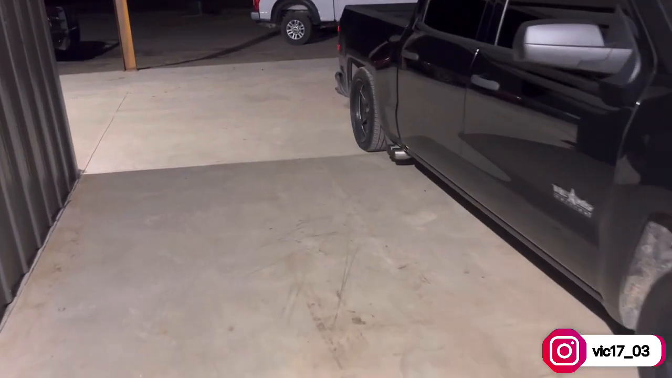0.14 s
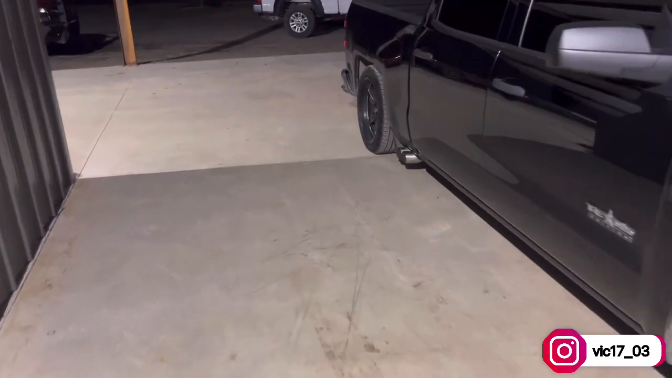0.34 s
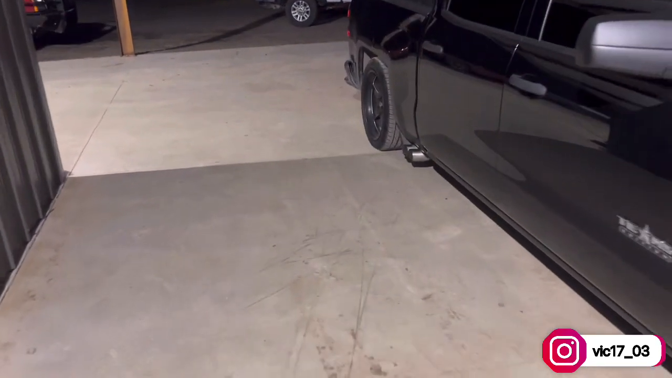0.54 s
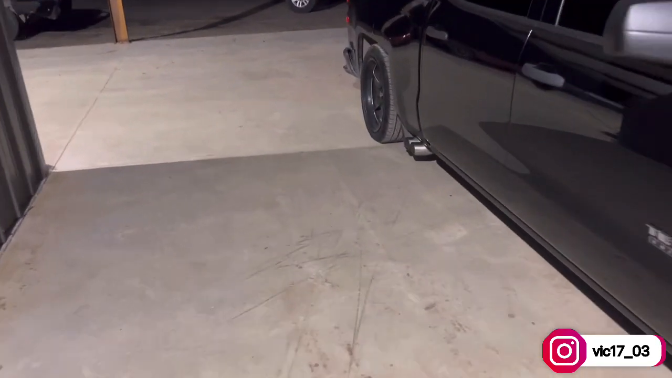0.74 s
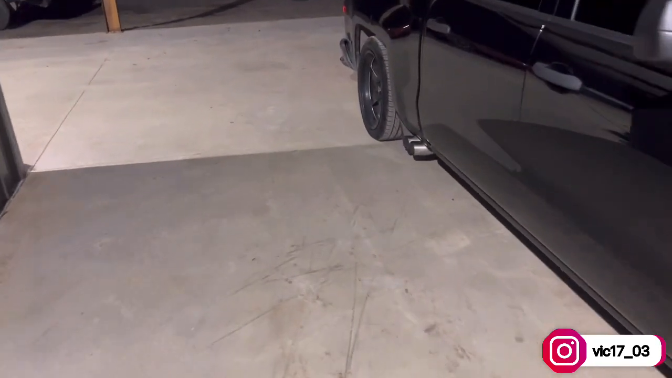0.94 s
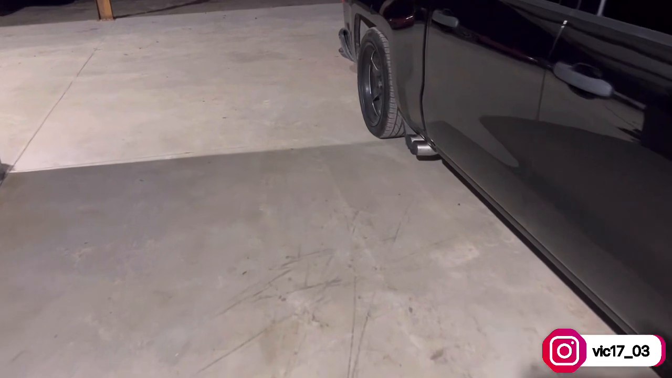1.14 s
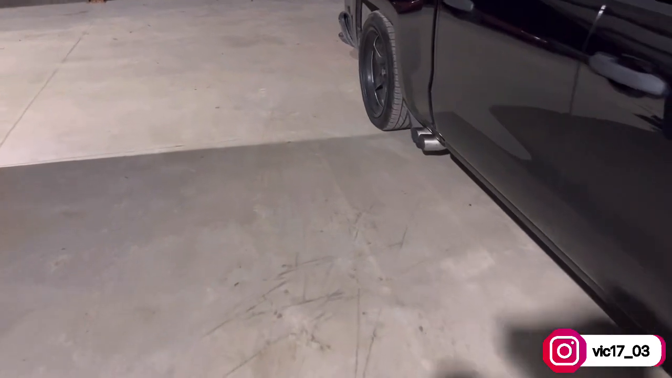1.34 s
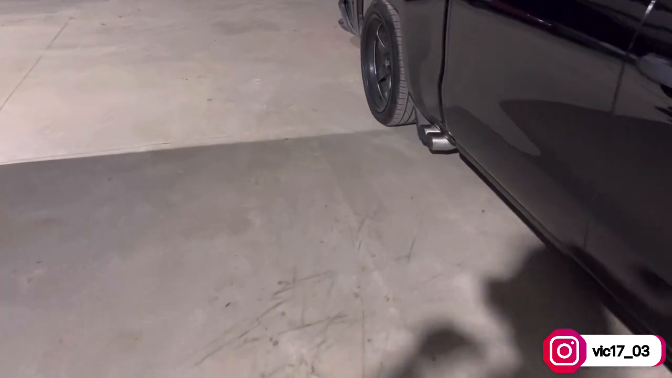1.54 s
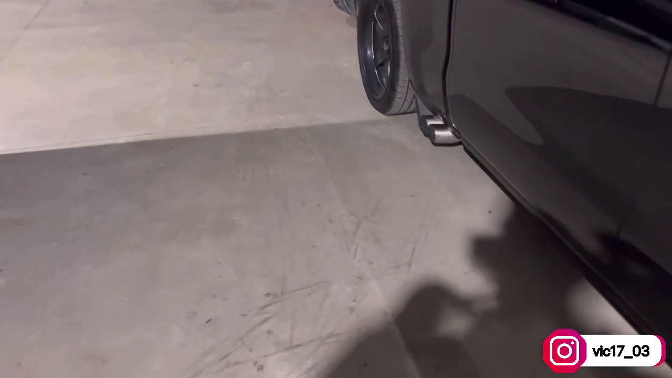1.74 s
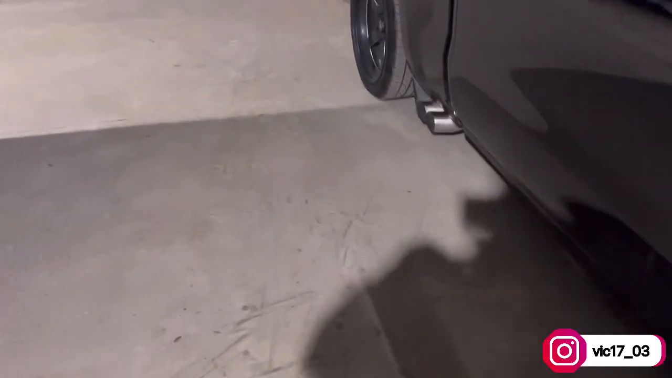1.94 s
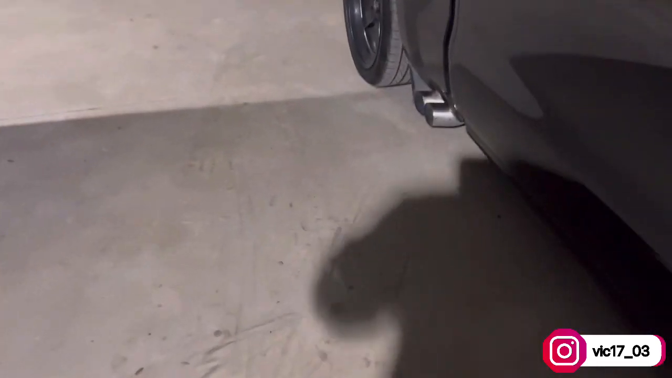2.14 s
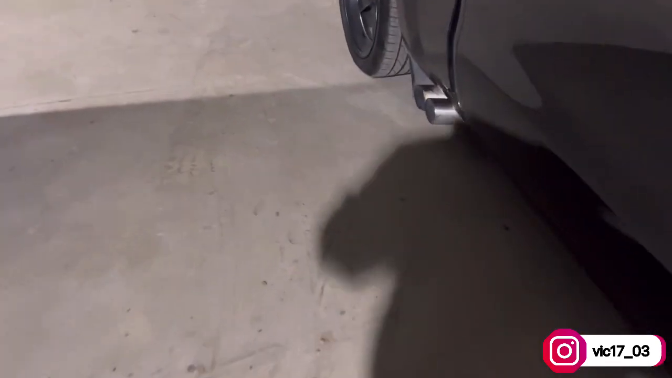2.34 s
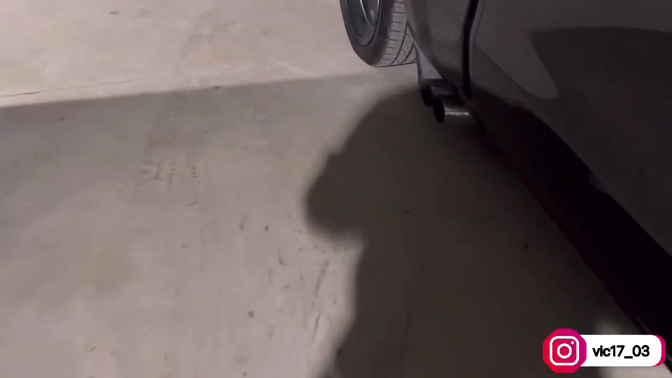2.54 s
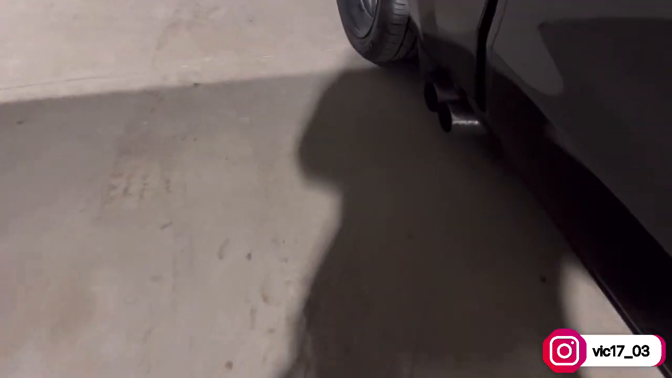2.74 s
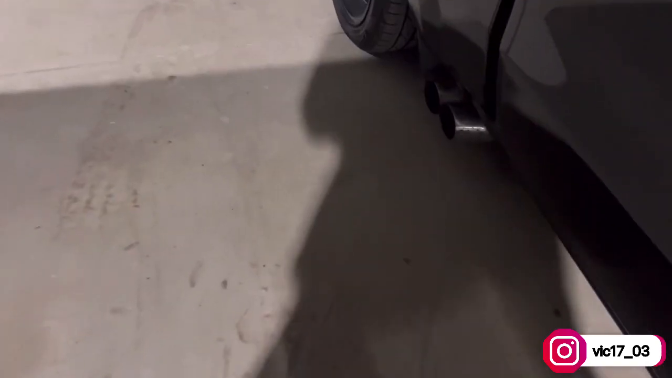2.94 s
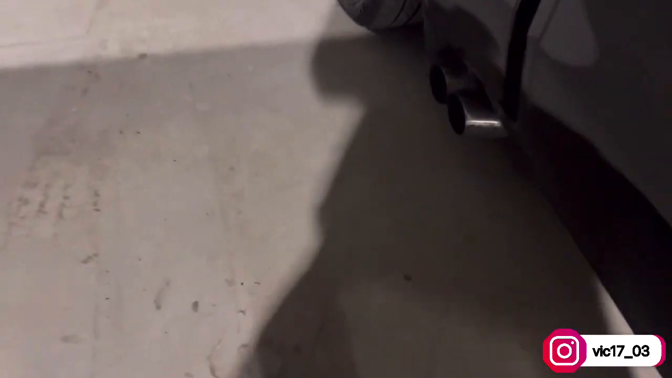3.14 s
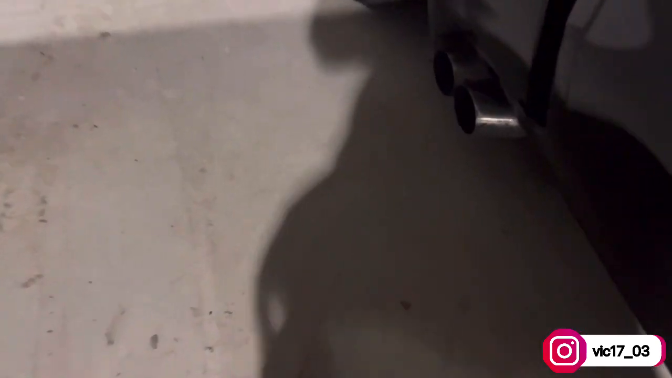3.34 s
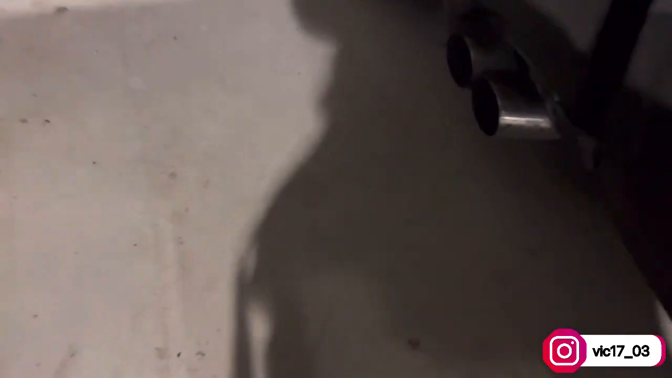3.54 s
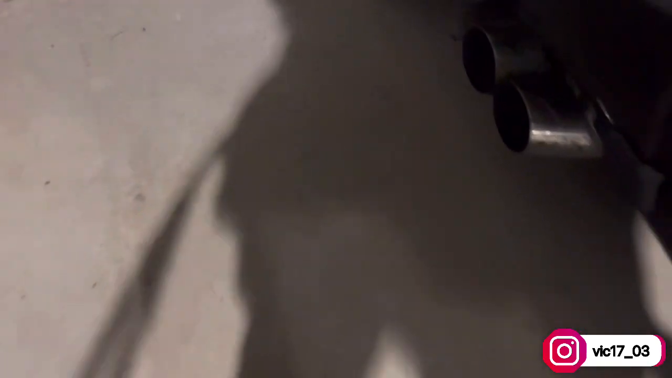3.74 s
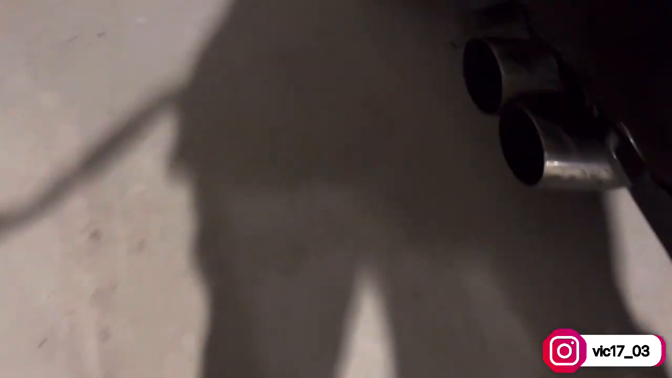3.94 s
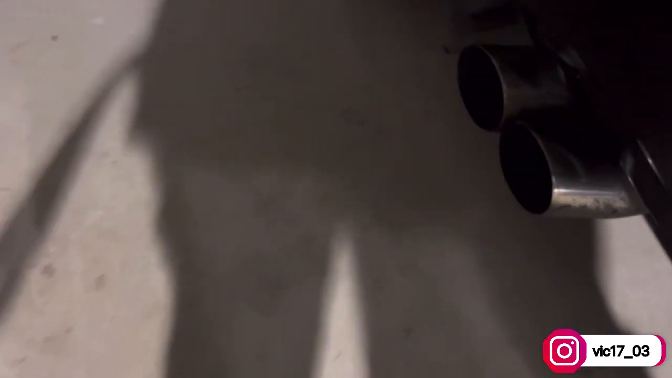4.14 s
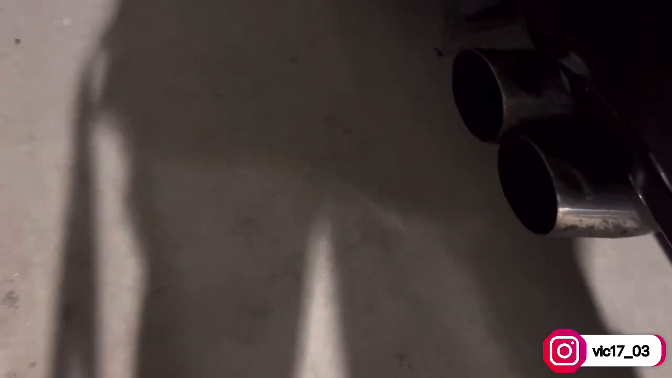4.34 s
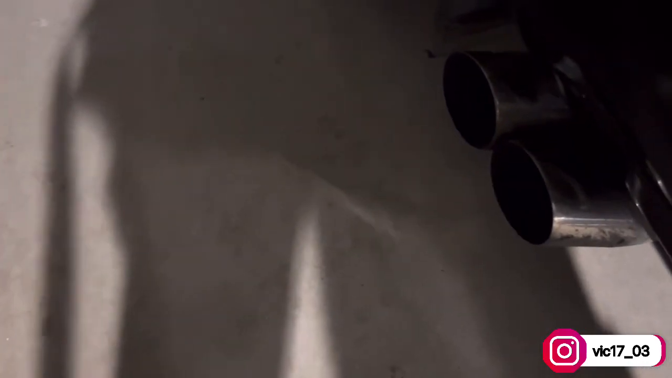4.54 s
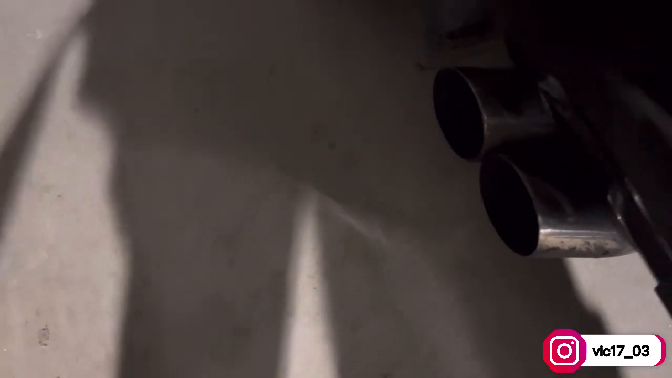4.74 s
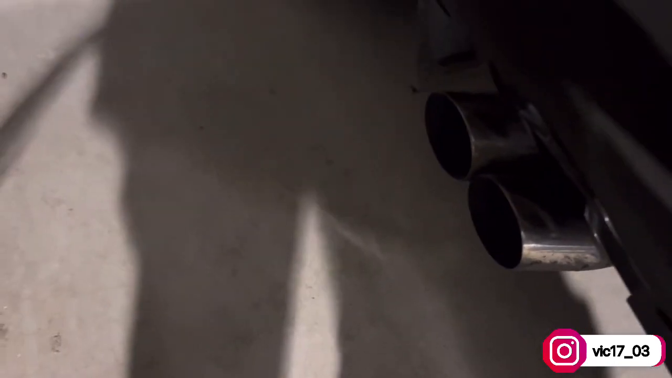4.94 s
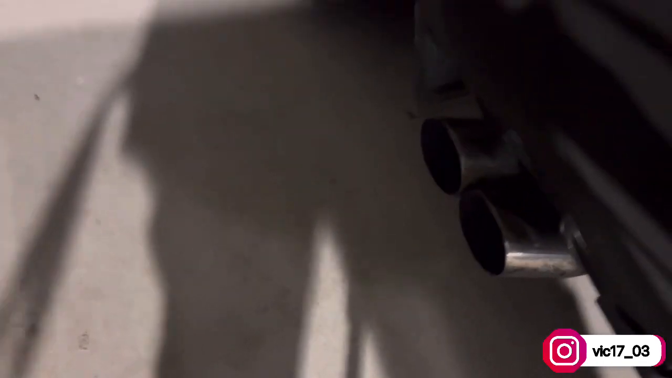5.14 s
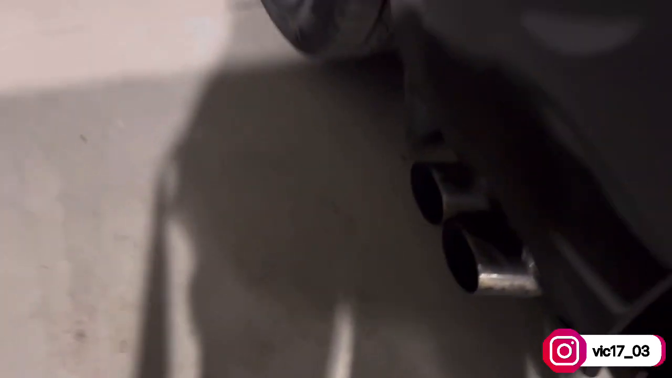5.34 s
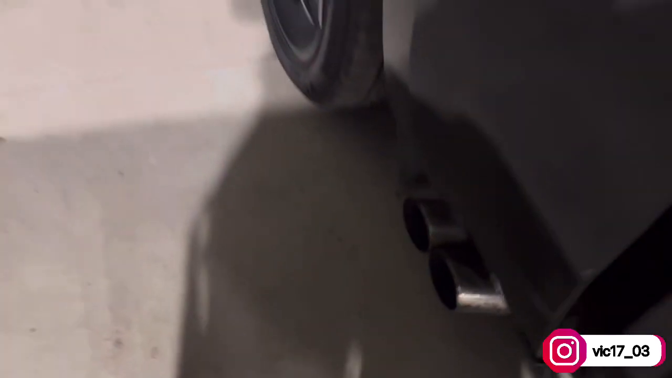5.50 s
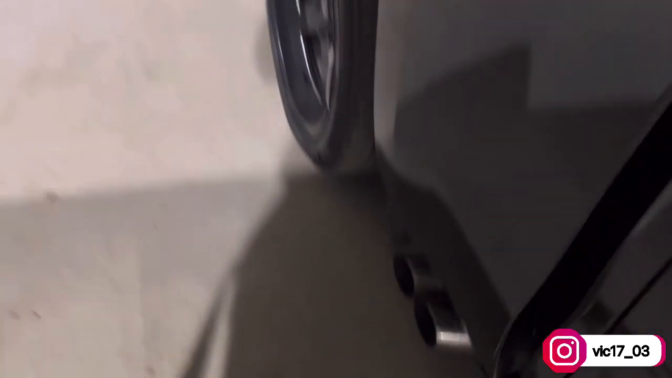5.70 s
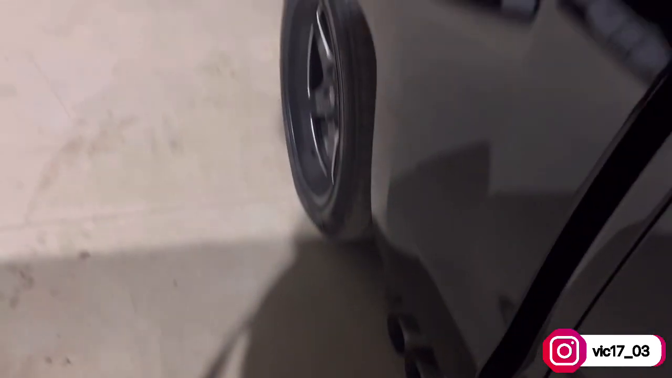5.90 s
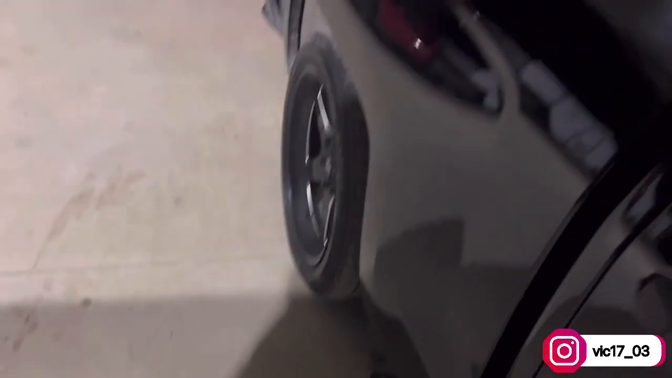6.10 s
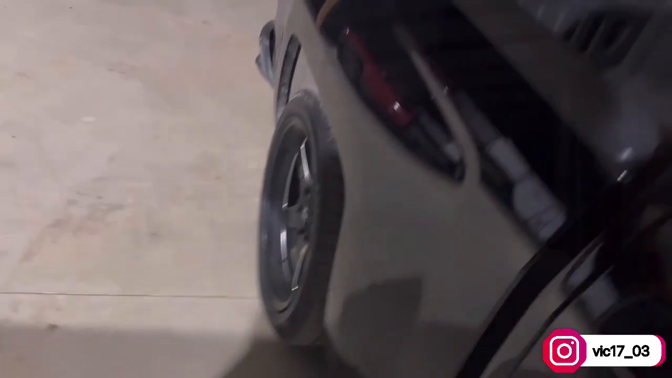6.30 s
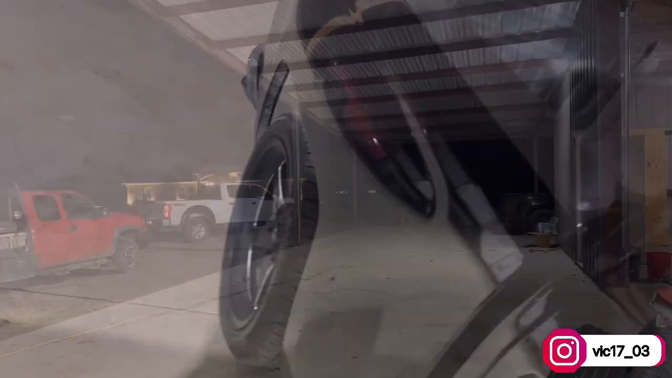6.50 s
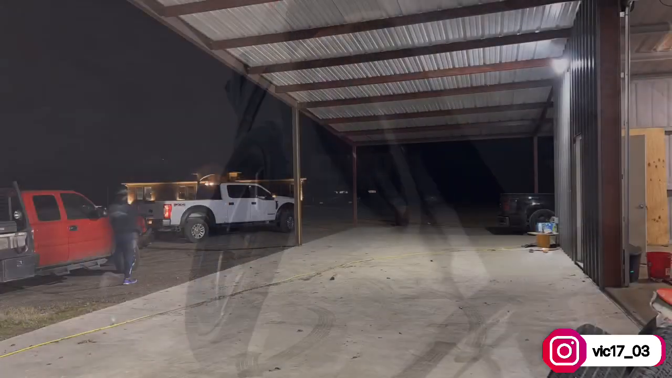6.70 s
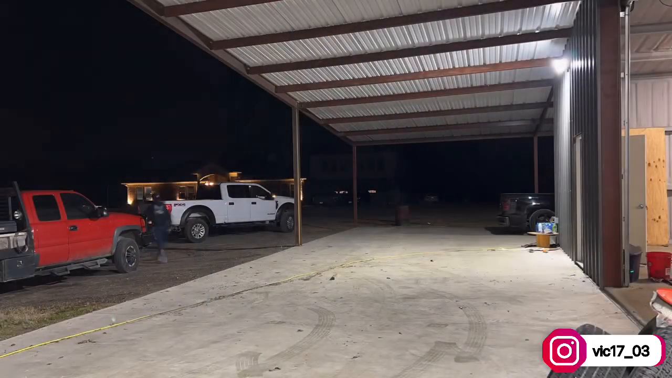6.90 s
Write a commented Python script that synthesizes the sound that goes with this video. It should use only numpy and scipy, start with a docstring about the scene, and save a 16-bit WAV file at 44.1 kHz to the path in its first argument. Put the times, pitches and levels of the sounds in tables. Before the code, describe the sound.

Continuous loping truck idle, already running at the start and never revving or stopping. At first it is a roomy, throbbing drone with blurred pulsing hiss from a few metres away. A handheld stereo pickup approaches the exhaust, the puffs become dry, raspy and crisp with spitting gas, strongest just past the middle, then the sound backs off and loses some roof echo. Soft footsteps barely show.

```python
"""Under a carport, a straight-piped V8 pickup idles as a microphone pair moves up to its side exhaust tips and past.
Eight uneven cylinders puff into the resonances of pipe and carport, which gives the lope; standing waves
crossed on the walk make the drone swell and fade. Each puff also rasps, as decaying echoes and pulsed
turbulence; close by, streaks in the rasp slide upward three times in each cycle. Gas spits at the tips as short
bursts of noise, blurred by the roof into a pulsing hiss from further off; soft noise swells are probably footsteps."""
import sys
import numpy as np
from scipy import signal
from scipy.fft import rfft, irfft, next_fast_len
from scipy.io import wavfile
from scipy.ndimage import uniform_filter1d, minimum_filter1d, map_coordinates

SR = 44100
rng = np.random.default_rng(int(sys.argv[2]) if len(sys.argv) > 2 else 0)


def int16_out(signal):
    """Quantize to a 16-bit WAV file."""
    q = np.round(np.clip(np.atleast_2d(signal).T, -1, 1) * 32767)
    wavfile.write(sys.argv[1], SR, q.astype(np.int16))


N = 311346
LEAD = SR  # samples: the engine is already running for a second before time zero
T = np.arange(-LEAD, N) / SR  # s
TOP_HZ = 15700  # upper band limit


def amp(db):
    """Logarithmic level: decibels to gain."""
    return 10 ** (np.asarray(db) / 20)


def unit(x):
    """Normalisation: x scaled to rms 1."""
    return x / np.sqrt(np.mean(x ** 2) + 1e-20)


def along(points, hz):
    """Logarithmic pitch: (frequency, value) points interpolated on a log frequency axis."""
    f, v = np.transpose(points)
    return np.interp(np.log(hz + 1), np.log(f), v)


def curves(rows):
    """Linear interpolation: one value per sample for each column after the time."""
    s, *columns = np.transpose(rows)
    return [np.interp(T, s, column) for column in columns]


def filtered(x, response):
    """Linear filtering: the spectrum of x times a response of frequency."""
    m = next_fast_len(len(T) + SR)
    return irfft(rfft(x, m) * response(np.fft.rfftfreq(m, 1 / SR)), m)[..., :len(T)]


def below(hz, edge_hz):
    """Low-pass filtering: gain that falls steeply above the edge."""
    return 1 / (1 + (hz / edge_hz) ** 20)


# Likeness of the two channels: (frequency [Hz], left-right correlation [0 to 1])
CHANNEL_CORRELATION = [(200, 0.86), (450, 0.87), (700, 0.41), (1200, 0.67), (2500, 0.75), (5000, 0.58),
                       (8000, 0.42), (11000, 0.13)]


def spread(mid, side, colour):
    """Interchannel coherence: the share of side against mid sets how alike left and right are."""
    def mid_and_side_gains(hz):
        turn = np.arccos(np.clip(along(CHANNEL_CORRELATION, hz), -1, 1)) / 2
        return amp(along(colour, hz)) * [np.cos(turn), np.sin(turn)]

    m, s = filtered(np.array([mid, side]), mid_and_side_gains)
    return unit(np.array([m + s, m - s]))


def impulses(times, sizes):
    """Impulsive excitation: one impulse of each size at each time."""
    at = np.clip(np.round(times * SR).astype(int) + LEAD, 0, len(T))
    return np.bincount(at, sizes, len(T) + 1)[:-1]


def smeared(x, kernel):
    """Superposition: x convolved with a causal kernel."""
    return signal.fftconvolve(x, kernel)[:len(T)]


def swell(rise):
    """Transient flow: the outline of one gush of gas peaks after rise seconds and dies away."""
    u = np.arange(SR // 4) / SR / rise
    return u * np.exp(1 - u)


def fading(t60):
    """Reverberant decay: an exponential of energy 1 that falls 60 dB in t60 seconds."""
    decay = amp(-60 * np.arange(SR // 2) / SR / t60)
    return decay / np.linalg.norm(decay)


def ring(puffs, modes, top_hz):
    """Modal resonance: puffs through each damped mode, one signal per mode, up to top_hz."""
    m = next_fast_len(len(T) + SR)
    f = np.fft.rfftfreq(m, 1 / SR)
    f = f[f < top_hz]
    spectrum = rfft(puffs, m)[:len(f)]
    rings = []
    for centre, width, db, *_ in modes:
        response = amp(db) * 1j * f * width / (centre * centre - f * f + 1j * f * width)
        rings.append(irfft(spectrum * response, m)[:len(T)])
    return rings


def wobble(rate):
    """Random fluctuation: a smooth curve through rate random knots a second."""
    knots = (T - T[0]) * rate
    return map_coordinates(rng.standard_normal(int(knots[-1]) + 4), [knots])


# Mean speed of the hunting idle: (time [s], crank speed [rpm])
IDLE_SPEED = [(0.0, 751.2), (0.41, 751.8), (0.83, 747.5), (1.24, 742.8), (1.66, 737.5), (2.07, 737.8),
              (2.49, 746.8), (2.9, 746.1), (3.32, 743.1), (3.73, 743.7), (4.15, 731.9), (4.56, 731.6),
              (4.98, 735.1), (5.39, 748.5), (5.81, 741.9), (6.22, 734.7), (6.64, 737.6), (7.05, 736.9)]


def engine_cycles():
    """Four-stroke timing: two crank turns make a cycle, and the crank never turns quite evenly."""
    waver_cycles, waver_per_s = .002, 7
    rpm, = curves(IDLE_SPEED)
    cycles = np.cumsum(rpm / 120) / SR
    return cycles - cycles[LEAD] + waver_cycles * wobble(waver_per_s)


def firings(cycles, pattern, scatter_db, jitter, cycle_db):
    """Cyclic variation: a row of impulses per cylinder, jittered (s) and scattered in strength (dB)."""
    late, db = np.transpose(pattern)
    whole = np.arange(np.ceil(cycles[0]) + 1, cycles[-1] + 1)[:, None]
    at = whole + (np.arange(len(late)) + late) / len(late)
    times = np.interp(at, cycles, T, right=T[-1] + 1) + jitter * rng.standard_normal(at.shape)
    burn_db = scatter_db * rng.standard_normal(at.shape)
    shared_db = cycle_db * rng.standard_normal(whole.shape)
    sizes = amp(db + burn_db + shared_db)
    return np.array([impulses(s, size) for s, size in zip(times.T, sizes.T)])


# Cylinders of each bank: (four places in the firing order [counted from 0])
BANK_CYLINDERS = [(0, 2, 5, 7), (1, 3, 4, 6)]


def by_bank(puffs):
    """Separate ducts: the puffs that go down each of the two pipes."""
    return [puffs[list(bank)].sum(axis=0) for bank in BANK_CYLINDERS]


# Path of the microphones: (time [s], distance to the exhaust tips [m])
TIP_DISTANCE = [(0, 3.03), (2, 2.04), (3, 1.58), (3.5, 1.22), (4, 0.76), (4.6, 0.71), (5.2, 0.88), (6, 1.8),
                (7.06, 1.93)]


def distance_to_tips():
    """Source distance: metres from the microphones to the tips along the walk."""
    return curves(TIP_DISTANCE)[0]


def outside():
    """Loss of enclosure: 0 under the roof, 1 once the microphones have left it."""
    leave_s, takes_s = 5.35, 0.18
    return .5 + .5 * np.tanh((T - leave_s) / (2 * takes_s))


# Carrying of rasp and spit, by name:
# (direct level at 1 m [dB], loss per doubling of distance [dB], carport's answer under the roof [dB])
CARRYING = {"rasp": (-36, 8.45, -42), "spit": (-57, 14, -50.5)}


def carried(layer):
    """Direct and reverberant fields: one falls with distance, the other is even under the roof."""
    leave_loss_db = 6
    direct_db, loss_db, carport_db = CARRYING[layer]
    direct = amp(direct_db - loss_db * np.log2(distance_to_tips()))
    return np.hypot(direct, amp(carport_db - leave_loss_db * outside()))


def crest(s, half_length, db):
    """Local rise and fall: a bell-shaped gain around time s, half_length seconds to one deviation."""
    return amp(db) * np.exp(-.5 * ((T - s) / half_length) ** 2)


def approached(pair, far_colour, near_colour):
    """Path-dependent spectrum: the far colour gives way to the near one close to the tips."""
    near = 1 / (1 + (distance_to_tips() / 1.7) ** 4)
    return (1 - near) * spread(*pair, far_colour) + near * spread(*pair, near_colour)


def streaked(pair, depth_db, size):
    """Interference: narrow bands, size bins wide, lift and sink at random as by reflections."""
    z = signal.stft(pair, nperseg=2048)[2]
    patch = np.outer(np.hanning(size), np.hanning(15))
    field = signal.fftconvolve(rng.standard_normal(z.shape[1:]), patch, "same")
    out = signal.istft(z * amp(depth_db * unit(field)), nperseg=2048)[1][:, :len(T)]
    return unit(out)


def curled(x, cycles, depth):
    """Moving comb filter: streaks of emphasis slide upward through x, in step with the engine."""
    gap_hz, curls_per_cycle = 130, 3
    later = filtered(x, lambda hz: np.exp(-2j * np.pi * hz / gap_hz))
    analytic = signal.hilbert(later, next_fast_len(len(T)))[:len(T)]
    turning = analytic * np.exp(2j * np.pi * curls_per_cycle * cycles)
    return (x + depth * turning.real) / np.hypot(1, depth)


# Standing waves of the carport, crossed on the walk:
# (frequency [Hz], width [Hz], relative level [dB], time of a crest [s], time from crest to crest [s])
CARPORT_MODES = [(65.3, 3.7, -30.4, -1.42, 6.26), (95.1, 12.2, -23.7, 4.28, 7.14),
                 (111.6, 5.6, -44.3, 5.38, 2.01), (113.2, 3.0, -42.1, 4.28, 7.08),
                 (123.9, 18.0, -21.8, 0.96, 3.27), (124.6, 66.7, -32.1, 4.25, 2.67),
                 (130.6, 3.6, -11.6, 4.14, 4.72), (149.3, 3.7, -36.4, 5.5, 2.99),
                 (170.5, 7.8, -31.4, 1.59, 2.82), (200.6, 5.2, -18.1, 3.42, 2.79),
                 (201.1, 6.4, -18.3, 6.44, 3.04), (228.0, 3.0, -24.1, 1.52, 2.73),
                 (229.1, 3.1, -30.7, 3.53, 1.13), (230.8, 3.3, -27.6, 1.26, 7.14),
                 (268.1, 3.0, -29.9, 1.75, 2.81), (280.3, 3.1, -32.8, 1.53, 2.94),
                 (302.2, 26.2, -48.1, 2.26, 2.22), (345.6, 8.1, -41.1, 4.36, 7.14)]


def carport_drone(puffs):
    """Standing waves: each mode the puffs ring swells and vanishes between crests and nodes."""
    drone = 0
    for rung, (*_, crest_s, spacing_s) in zip(ring(puffs, CARPORT_MODES, top_hz=900), CARPORT_MODES):
        drone = drone + rung * np.cos(np.pi * (T - crest_s) / spacing_s)
    return amp(60.5) * drone


# Spit of gas after each firing, in firing order: (lateness [firing intervals], relative strength [dB])
SPIT_PATTERN = [(.1, 4.5), (0.096, 6.5), (0.46, 1.5), (.08, 2), (0.3, 2.5), (0.2, 3), (.08, 2), (0.27, 6)]
# Colour of the spitting near the tips: (frequency [Hz], relative density [dB per Hz])
SPIT_NEAR_COLOUR = [(1500, -40), (2400, -3), (3200, -4), (3900, 1.5), (4750, -1), (5400, -8), (6200, -7.5),
                    (6900, -0.5), (7400, -2), (8000, 1.5), (9100, -7), (9900, -30), (15000, -17)]
# The same from beside the front door, where the ground reflection falls differently:
# (frequency [Hz], relative density [dB per Hz])
SPIT_FAR_COLOUR = [(1500, -30.5), (2400, 1.5), (3000, 3), (3400, -3.5), (4000, 0), (4800, -3), (5600, -7),
                   (6400, -4), (7200, 0), (8000, 3), (9000, -2), (9800, -24.5), (15000, -15)]


def spitting(cycles):
    """Jet noise: short hisses at the tips, crisp from close by, blurred by the roof from further off."""
    steady_hiss = .12  # power of the flow between spits, against theirs
    distance = distance_to_tips()
    spits = firings(cycles, SPIT_PATTERN, scatter_db=1.5, jitter=.0005, cycle_db=.5).sum(axis=0)
    direct = np.abs(smeared(spits ** 2, swell(rise=0.004) ** 2))
    roof = np.abs(smeared(direct, swell(rise=0.014) ** 2))
    wet = distance ** 2 / (distance ** 2 + 1.0 ** 2) * (1 - .5 * outside())
    power = (1 - wet) * direct / direct.mean() + wet * roof / roof.mean() + steady_hiss
    hiss = np.sqrt(power) * rng.standard_normal((2, len(T)))
    coloured = streaked(approached(hiss, SPIT_FAR_COLOUR, SPIT_NEAR_COLOUR), depth_db=3.0, size=7)
    # the steel tips tick with each spit, heard from just behind them: one mode (Hz, width Hz, dB)
    tick = unit(ring(direct * rng.standard_normal(len(T)), [(4780, 140, 0)], TOP_HZ)[0])
    return carried("spit") * coloured + crest(5.25, .65, -62) * tick


# Scuffs, probably footsteps on the walk: (time [s], half-length [s], level [dB])
SCUFFS = [(1.46, 0.013, -48.5), (1.643, 0.02, -49), (2.602, 0.012, -48), (2.78, 0.03, -51.5),
          (4.038, 0.028, -46.5), (4.698, 0.021, -47.5), (5.681, 0.024, -51.5)]


def scuffs():
    """Friction noise: a foot scuffs, as bell-shaped swells of noise in the colour of the near spitting."""
    outline = sum(crest(*row) for row in SCUFFS)
    return outline * spread(*rng.standard_normal((2, len(T))), SPIT_NEAR_COLOUR)


# Sharper spits that stand out: (time [s], relative peak level [dB])
SHARP_SPITS = [(0.517, -36), (3.5367, -32), (3.5706, -33), (4.176, -33), (4.197, -32.5), (4.259, -28.5),
               (4.4047, -29), (4.547, -39.5), (4.652, -36), (4.6911, -32), (4.861, -36), (5.062, -36.5)]


def cracks():
    """Transient jet noise: now and then a harder spit leaves the tips."""
    s, db = np.transpose(SHARP_SPITS)
    outline = smeared(impulses(s, amp(db - 9.5)), swell(rise=.0018))
    return outline * spread(*rng.standard_normal((2, len(T))), SPIT_NEAR_COLOUR)


# Rasp of each firing, in firing order: (lateness [firing intervals], relative strength [dB])
RASP_PATTERN = [(.05, 4.5), (-.15, 4.5), (-.1, 4.5), (-.3, 3), (-.1, 2), (-.1, 1.5), (-.1, 3), (.05, 3.5)]
# Colour of the rasp near the tips: (frequency [Hz], relative density [dB per Hz])
RASP_NEAR_COLOUR = [(330, -34), (430, -13), (490, -2), (560, -32), (640, -14.5), (760, 0.5), (1000, 1.5),
                    (1200, -3), (1350, -13), (1580, -5), (2000, -23.5), (2300, -15), (2800, -36.5),
                    (5000, -66.5)]
# The same from beside the front door: (frequency [Hz], relative density [dB per Hz])
RASP_FAR_COLOUR = [(330, -37), (440, -5.5), (510, 7), (570, -8.5), (640, -7.5), (780, 5), (1000, -5),
                   (1150, -4), (1300, -12.5), (1600, -13.5), (2050, -15.5), (2700, -27.5), (5000, -64.5)]
# The two bands that swell at the honk's crest: (frequency [Hz], relative density [dB per Hz])
HONK_COLOUR = [(380, -29), (470, 6.5), (530, 0.5), (610, -31), (1300, -30), (2100, -13.5), (2600, -40.5),
               (5000, -73.5)]
# The band that swells at the grit's crest: (frequency [Hz], relative density [dB per Hz])
GRIT_COLOUR = [(1000, -34.5), (1400, 0.5), (1600, 1.5), (1850, -4.5), (2100, -5.5), (2500, -24),
               (4000, -46.5)]
# Places where standing waves and reflections lift one part of the rasp, by name:
# (time [s], half-length [s], level [dB])
RASP_CRESTS = {"bark": (1.38, 0.47, -41.5), "honk": (2.6, 0.99, -41.5), "grit": (3.63, 0.77, -46)}


def rasp(cycles):
    """Turbulence and reverberation: puffs drag noise and echo; close by they stand clear of the echo."""
    distance = distance_to_tips()
    banks = by_bank(firings(cycles, RASP_PATTERN, scatter_db=1, jitter=.00004, cycle_db=.3))
    gush = unit(np.sqrt(np.abs(smeared(sum(banks) ** 2, swell(rise=0.0063) ** 2))))
    wet = .65 * distance / (distance + .55)

    def rattle():
        echoes = [smeared(puffs, fading(t60=0.68) * rng.standard_normal(SR // 2)) for puffs in banks]
        return unit(sum(echoes))

    def turbulence():
        return unit((0.13 + gush) * rng.standard_normal(len(T)))

    def voice():
        return np.sqrt(wet) * rattle() + np.sqrt(1 - wet) * turbulence()

    curl_depth = .7 / (1 + (distance / 1.4) ** 4)
    pair = [curled(voice(), cycles, curl_depth), voice()]
    coloured = streaked(approached(pair, RASP_FAR_COLOUR, RASP_NEAR_COLOUR), depth_db=2.5, size=4)
    body = np.hypot(carried("rasp"), crest(*RASP_CRESTS["bark"])) * coloured
    grit = crest(*RASP_CRESTS["grit"]) * spread(turbulence(), turbulence(), GRIT_COLOUR)
    honk = crest(*RASP_CRESTS["honk"]) * spread(voice(), voice(), HONK_COLOUR)
    return body + grit + honk


# Resonances of the pipe:
# (frequency [Hz], width [Hz], relative level at 1 m [dB], loss per doubling of distance [dB])
PIPE_MODES = [(61.0, 15.2, -20.6, 6.4), (65.6, 28.7, -20.5, 5.5), (106.7, 29.3, -25.2, 5.3),
              (127.4, 3.0, -19.4, 5.8), (162.2, 8.5, -31.5, 4.2), (172.4, 3.0, -25.6, 10.5),
              (202.9, 3.0, -23.5, 2.0), (217.9, 3.0, -44.2, 2.0), (247.0, 3.0, -34.9, 2.0),
              (283.5, 66.7, -35.2, 6.7), (279.7, 28.1, -37.7, 2.0), (317.4, 8.2, -30.1, 9.8),
              (317.8, 4.2, -26.0, 9), (337.0, 23.0, -38.2, 3.8), (336.1, 54.7, -35.4, 5.5),
              (401.5, 3.0, -52.8, 2.0)]


def pipe_resonance(puffs):
    """Duct resonance: the puffs ring the pipe's modes, each growing as the microphones near the tips."""
    doublings = np.log2(distance_to_tips())
    note, sign = 0, -1
    for rung, (*_, loss_db) in zip(ring(puffs, PIPE_MODES, top_hz=900), PIPE_MODES):
        note = note + sign * rung * amp(-loss_db * doublings)
        sign = -sign  # neighbouring modes in opposite phase
    return amp(60.5) * note


# Exhaust puffs in firing order: (lateness [firing intervals], relative strength [dB])
PUFF_PATTERN = [(-0.586, 9.4), (-0.685, 10.3), (-0.323, 7.8), (-0.394, 4.2), (-0.655, 6.6), (-0.633, 7.3),
                (-0.686, -2.2), (-0.467, 9.1)]
# Bands lifted along the walk, or lowered where the two edges are reversed:
# (from [Hz], to [Hz], time [s], half-length [s], added part against the band [dB])
BAND_SWELLS = [(189, 228, 1.8, 0.12, -5.5), (257, 295, 4.2, 0.41, -11), (293, 450, 1.2, 0.25, -9.5),
               (215, 180, 2.5, 0.11, -12)]


def exhaust_note(cycles):
    """Source and resonator: uneven puffs drive pipe and carport, and reach each microphone in turn."""
    puffs = firings(cycles, PUFF_PATTERN, scatter_db=1, jitter=.00016, cycle_db=.4).sum(axis=0)
    both = carport_drone(puffs) + pipe_resonance(puffs)
    mid = filtered(both, lambda hz: (1 - below(hz, 40)) * below(hz, 491))
    for low_hz, high_hz, *place in BAND_SWELLS:
        mid = mid + crest(*place) * filtered(mid, lambda hz: below(hz, high_hz) - below(hz, low_hz))
    # the uneven firing of each bank also leaves a deep flutter, five beats to the cycle
    flutter = np.sin(2 * np.pi * 5 * cycles)
    mid = mid + amp(-41.5) * flutter / distance_to_tips()
    # a phase lead that grows with frequency sets the two microphones a moment apart
    side = filtered(mid, lambda hz: .025 + 1j * hz * .00088)
    return np.array([mid + side, mid - side])


def scene():
    """Common excitation: one engine cycle times note, rasp and spitting; scuffs and cracks are added."""
    cycles = engine_cycles()
    engine = spitting(cycles) + rasp(cycles) + exhaust_note(cycles)
    return (engine + scuffs() + cracks())[:, LEAD:]


def record(dry):
    """Peak limiting and band limiting: the highest peaks are held down, and nothing passes TOP_HZ."""
    ceiling = .93
    needed = np.minimum(1, ceiling / (np.abs(dry).max(axis=0) + 1e-9))
    gain = uniform_filter1d(minimum_filter1d(needed, size=700), size=600)
    fade_in = np.minimum(1, np.arange(N) / SR / .006)  # 6 ms, mirrored at the end
    limited = dry * gain * fade_in * fade_in[::-1]
    m = next_fast_len(N + SR)
    return irfft(rfft(limited, m) * (np.fft.rfftfreq(m, 1 / SR) < TOP_HZ), m)[:, :N]


dry = scene()
out = record(dry)
int16_out(out)
```